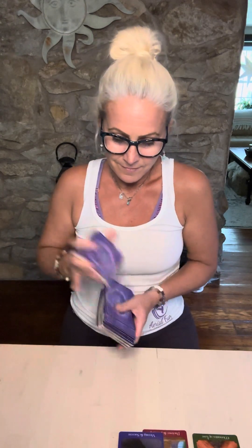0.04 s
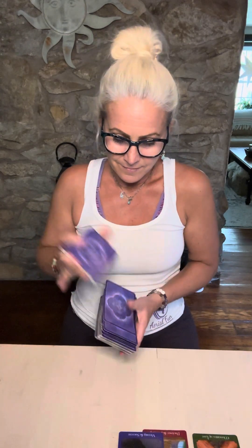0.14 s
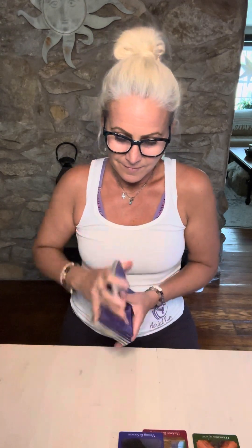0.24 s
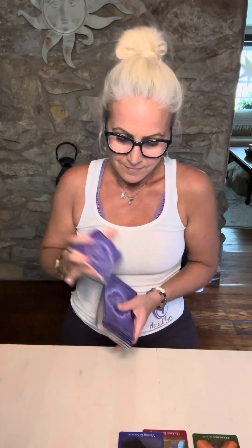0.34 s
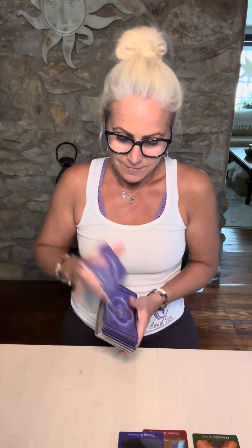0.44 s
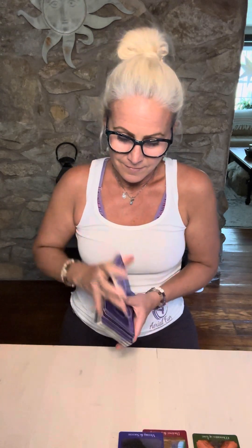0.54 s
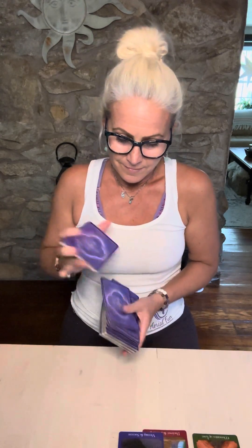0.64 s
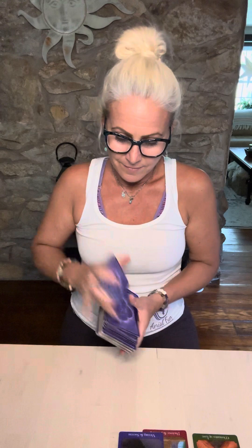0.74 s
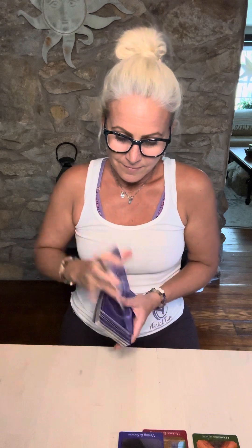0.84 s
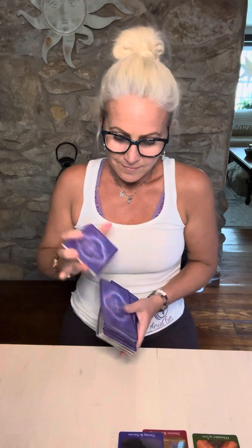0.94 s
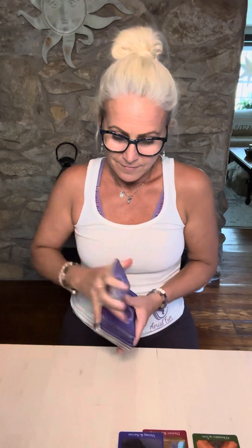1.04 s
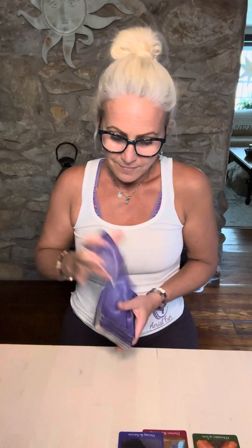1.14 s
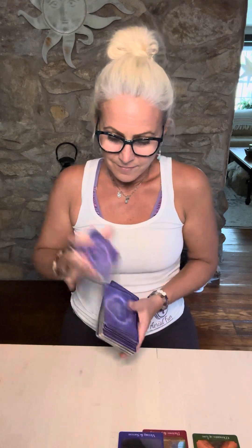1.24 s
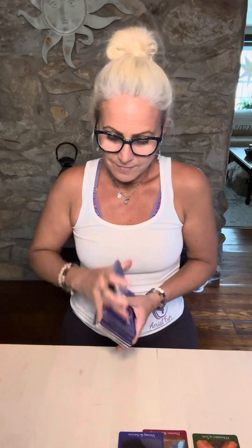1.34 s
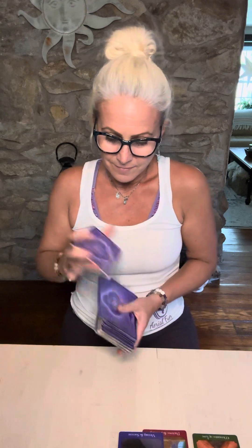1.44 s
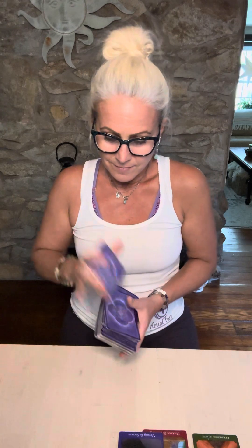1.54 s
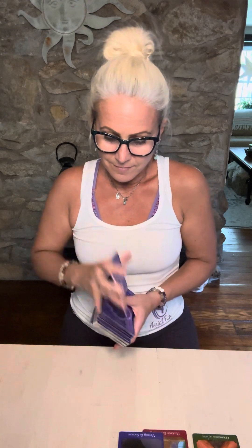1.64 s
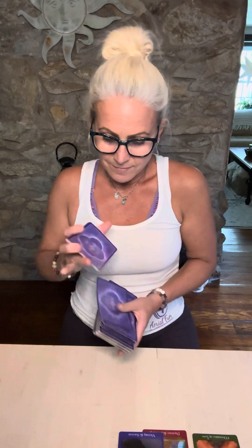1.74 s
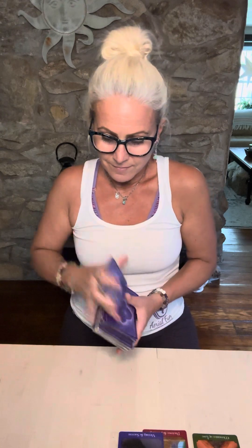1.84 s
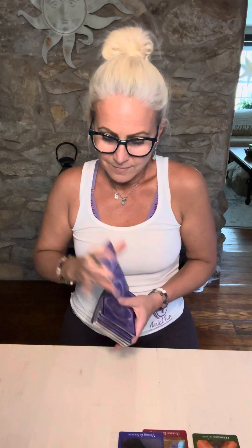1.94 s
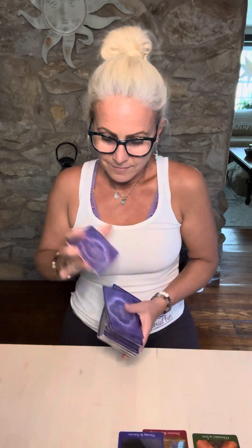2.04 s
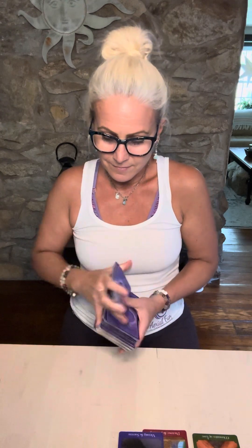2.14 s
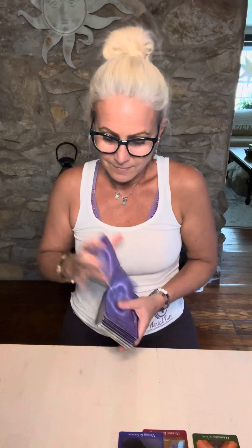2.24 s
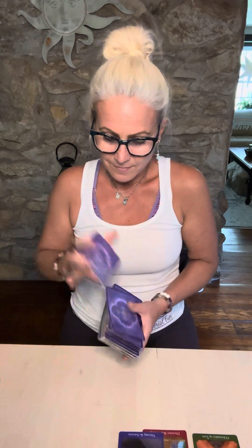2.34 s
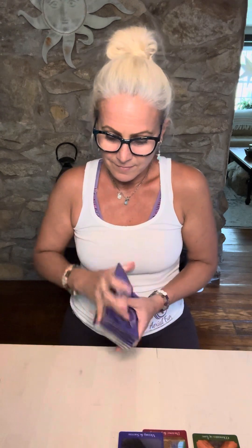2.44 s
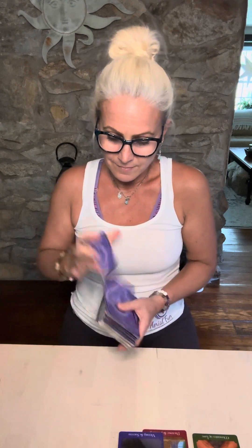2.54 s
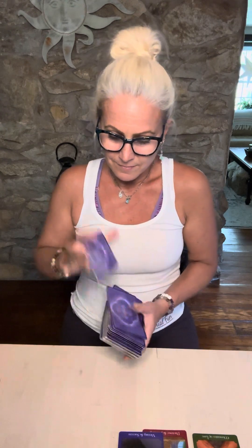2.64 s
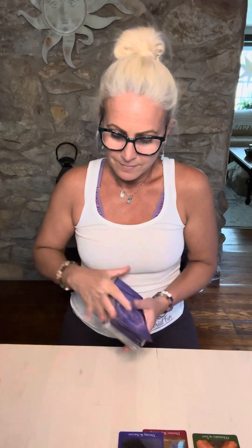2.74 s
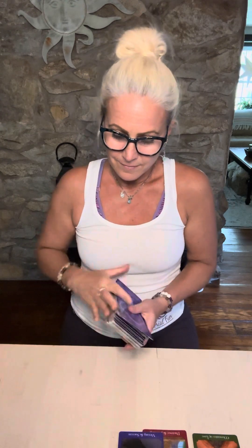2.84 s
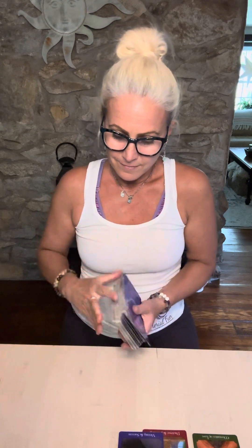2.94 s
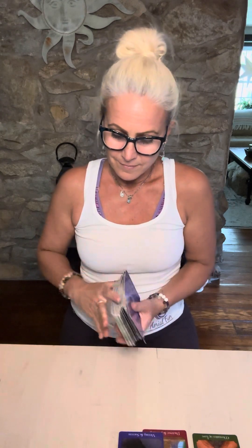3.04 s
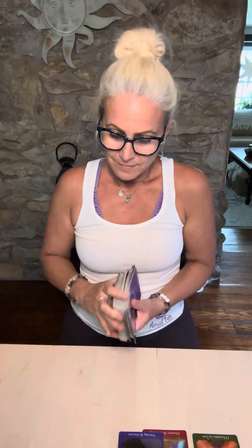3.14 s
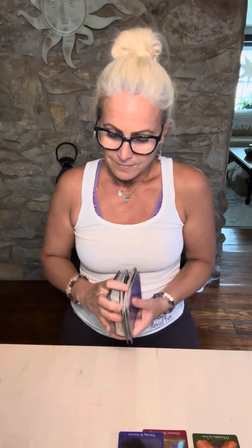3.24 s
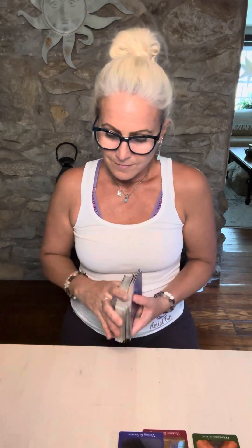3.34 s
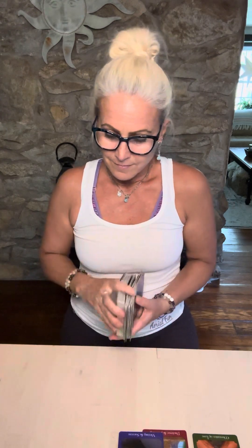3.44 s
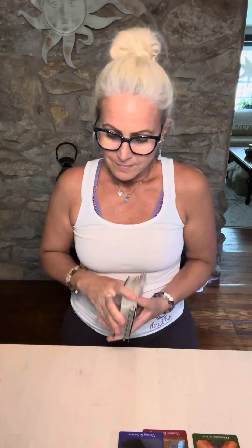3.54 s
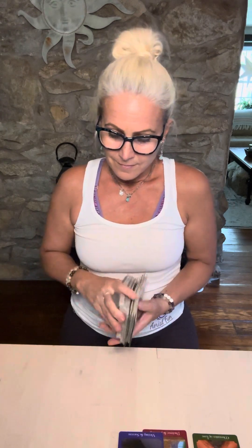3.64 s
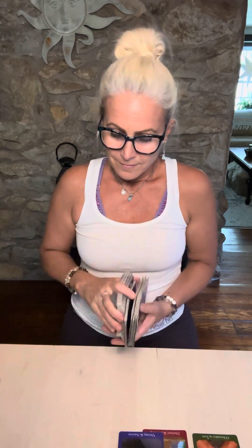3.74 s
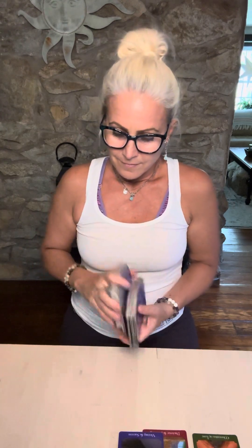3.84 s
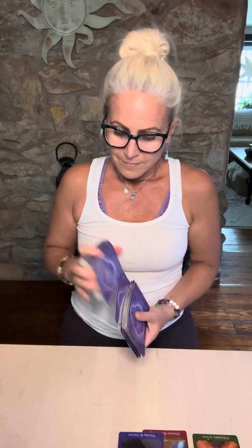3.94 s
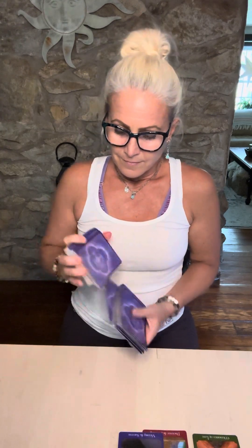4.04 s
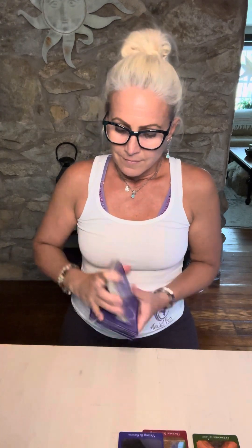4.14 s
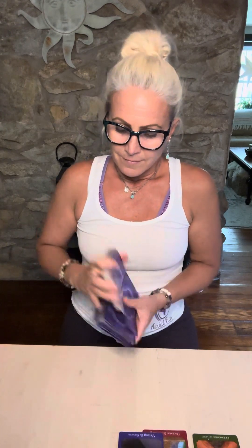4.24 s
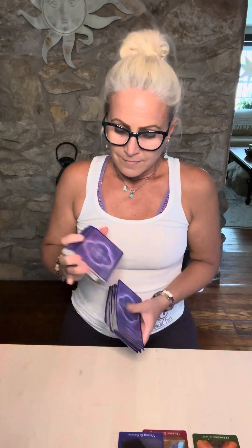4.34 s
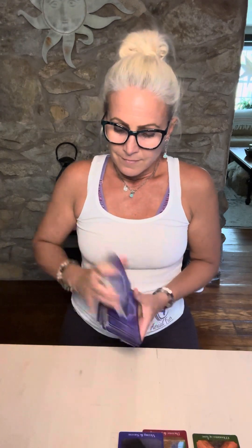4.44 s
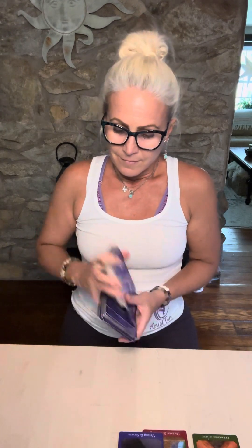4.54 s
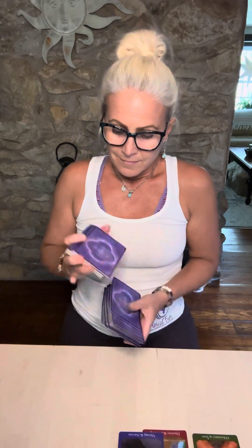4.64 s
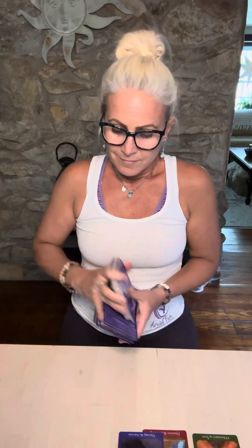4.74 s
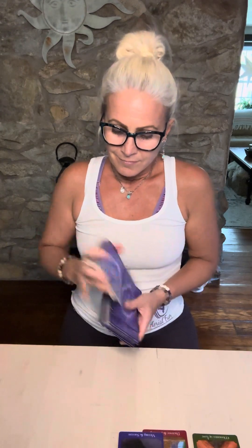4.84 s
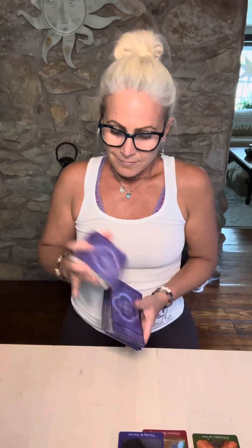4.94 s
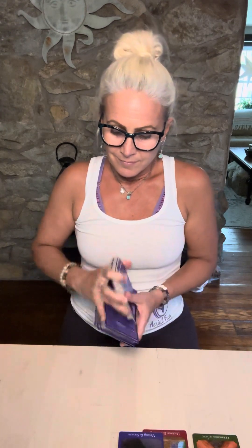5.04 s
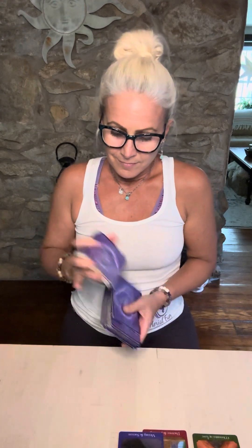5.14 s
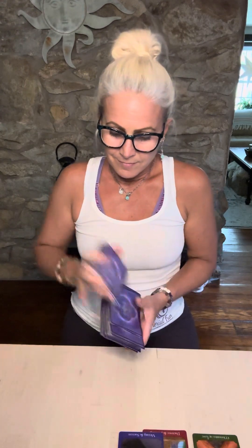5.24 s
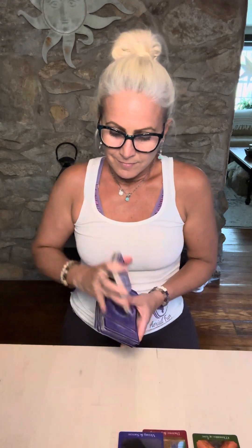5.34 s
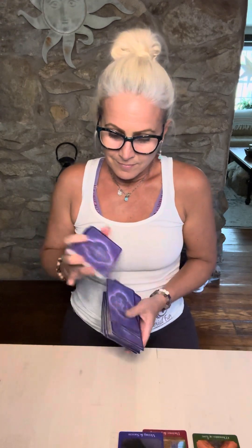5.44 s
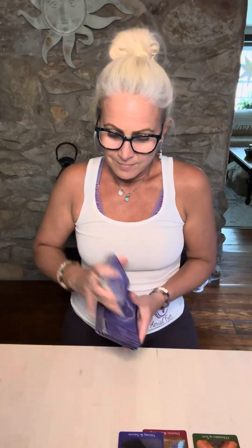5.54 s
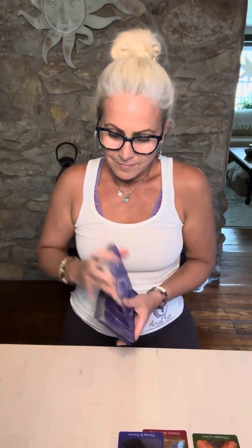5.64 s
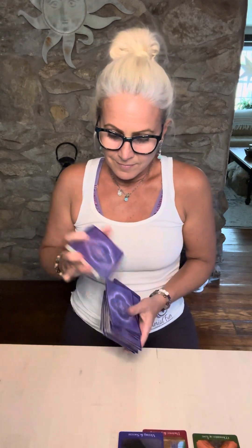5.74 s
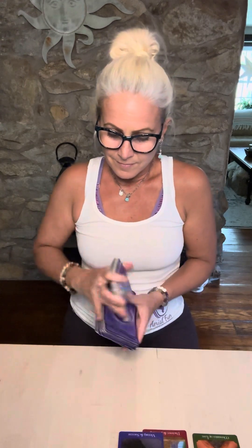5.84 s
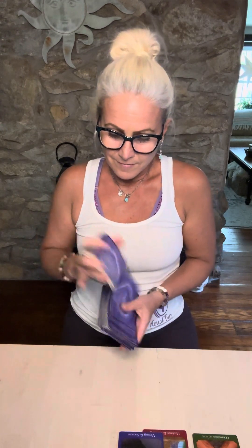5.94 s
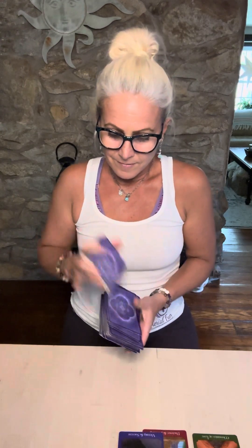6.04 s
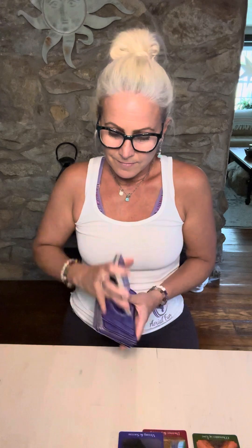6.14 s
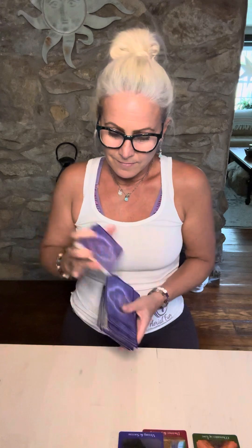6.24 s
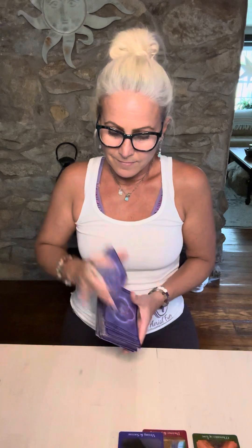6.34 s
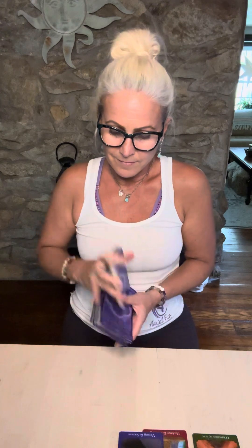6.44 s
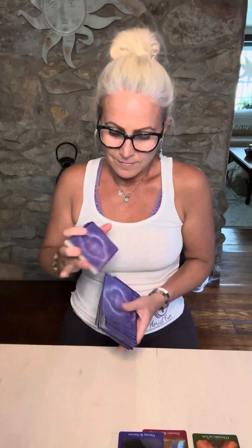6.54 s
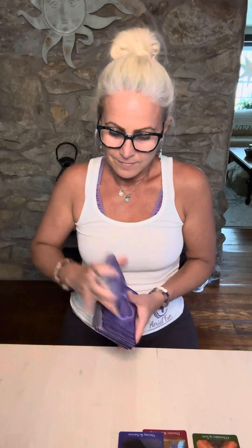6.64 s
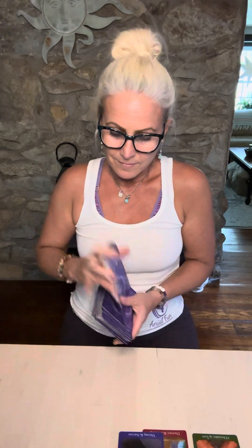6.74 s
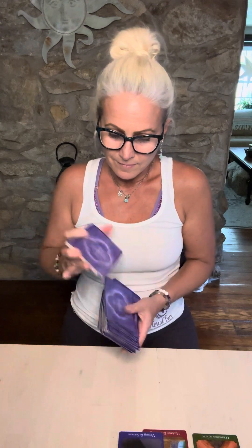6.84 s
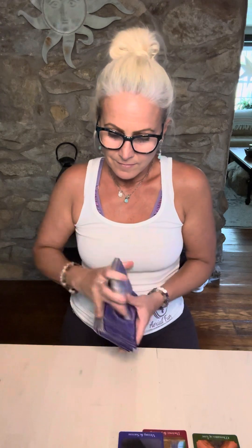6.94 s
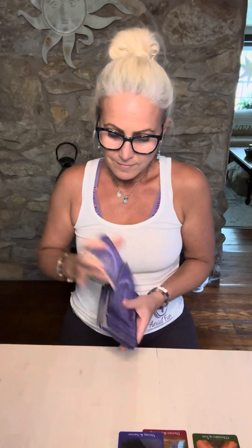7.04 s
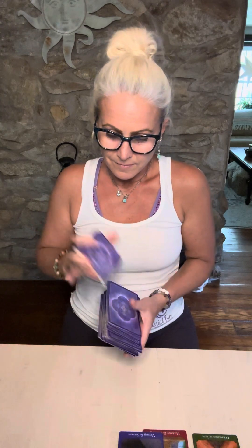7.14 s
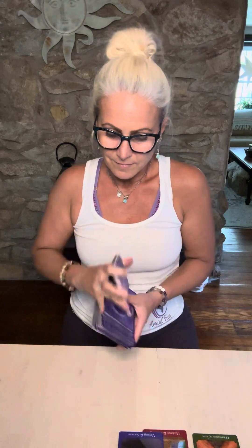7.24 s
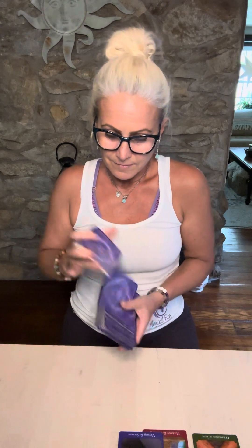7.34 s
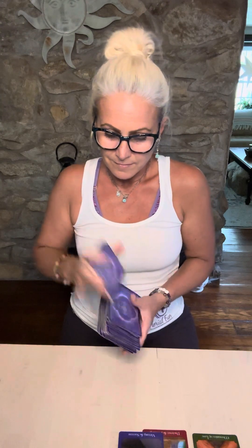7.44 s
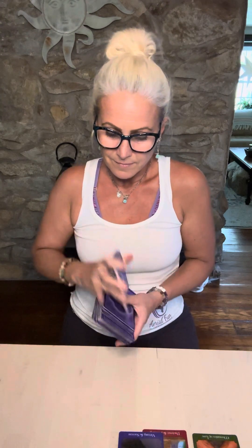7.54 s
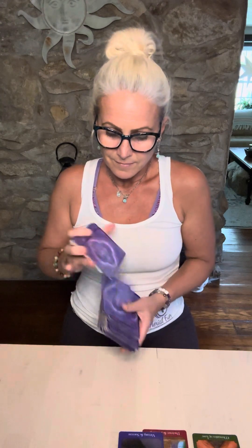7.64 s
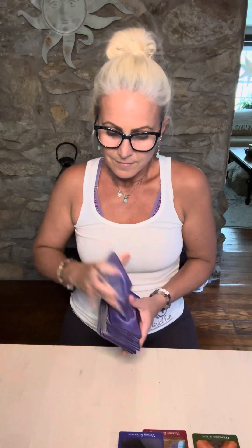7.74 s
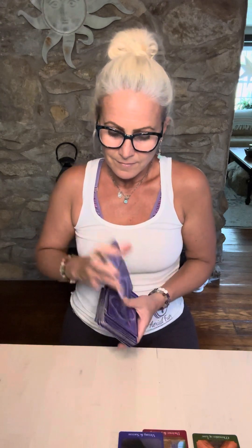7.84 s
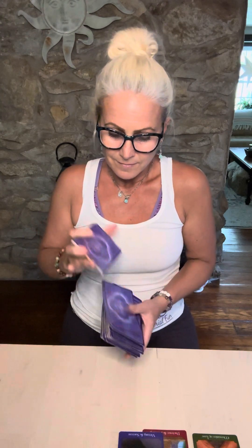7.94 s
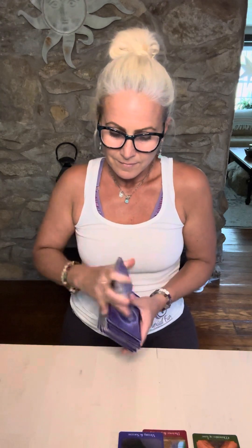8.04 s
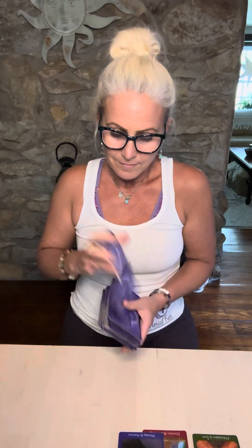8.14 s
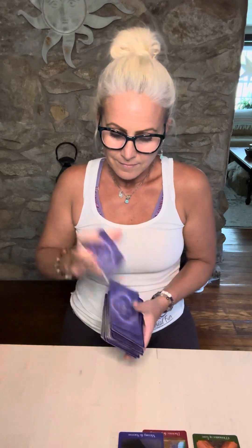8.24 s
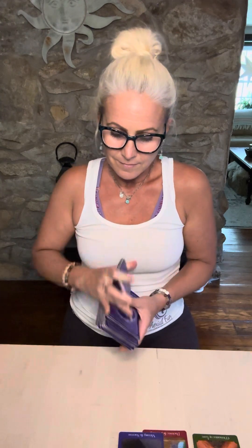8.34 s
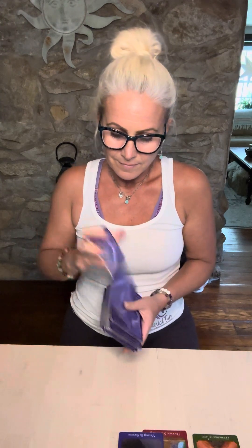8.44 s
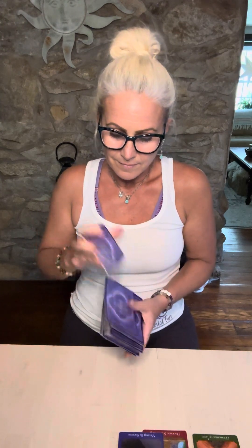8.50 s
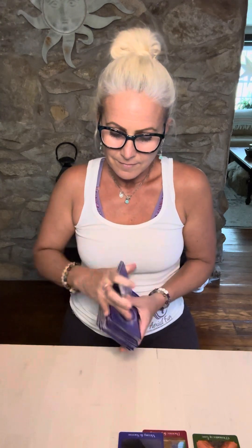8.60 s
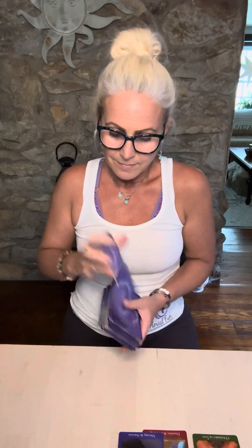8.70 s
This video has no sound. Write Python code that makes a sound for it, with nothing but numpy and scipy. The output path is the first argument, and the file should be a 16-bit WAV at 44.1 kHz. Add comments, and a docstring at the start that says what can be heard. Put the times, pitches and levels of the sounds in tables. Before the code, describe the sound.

A large deck of stiff cards is shuffled overhand in a small room, crisp snaps and papery slides repeating steadily with one short pause.

```python
"""In a small hard-walled room, a large deck of cards is shuffled overhand, three to four strokes a second.
In each stroke a packet slides off as wavering friction noise, and stiff edges flick free as bursts of snaps.
Packets land with a hollow clap of trapped air, a thump in the palm and a knock of edges, all resonant filtered noise.
Midway the deck is squared up during a short pause, with softer flicks and rubs. Light ticks, soft room noise,
a low hum and a faint hiss lie around the cards."""
import sys
import numpy as np
from scipy import signal
from scipy.fft import rfft, irfft, next_fast_len
from scipy.io import wavfile
from scipy.ndimage import uniform_filter1d

SR = 44100
rng = np.random.default_rng(int(sys.argv[2]) if len(sys.argv) > 2 else 0)


def inscribe(sig):
    """Save sig as 16-bit PCM at rate SR to the path in sys.argv[1].

    A 1-D sig is mono; a 2-D sig holds one channel per row.
    Samples are clipped to [-1, 1] before scaling.
    """
    pcm = np.round(np.clip(np.atleast_2d(sig).T, -1, 1) * 32767)
    wavfile.write(sys.argv[1], SR, pcm.astype(np.int16))


N = 386757  # length in samples

# Flicks of card edges, in strokes and while squaring up.
# Each row: time in seconds, relative strength in dB, typical stagger between cards in seconds.
FLICKS = [(0.142, -17, .0012), (0.2585, 4, .0016), (0.5366, 3.5, .001), (0.811, 3, .001),
          (1.0846, 3.5, .0005), (1.3575, 7, 0.00064), (1.627, 4.5, 0.00022), (1.8958, 5.5, .0005),
          (2.1692, 1.5, .0005), (2.4537, 5.5, .0005), (2.7436, -3.5, .0011), (3.3186, -10, 0.0018),
          (3.4957, -19, .0004), (3.697, -22.5, .002), (4.1868, -7.5, 0.0017), (4.5005, 2.5, .0006),
          (4.7861, 4.5, .0011), (5.0614, 2.5, .0008), (5.3336, 4, 0.00052), (5.608, 4.5, 0.00041),
          (5.8758, 4, .0011), (6.1478, 4.5, 0.00027), (6.424, 1.5, 0.00095), (6.702, 3.5, 0.00093),
          (6.9789, 4.5, .0006), (7.25, 1.5, 0.0013), (7.5275, 3, .0009), (7.7977, 5.5, 0.00061),
          (8.074, 2, .0009), (8.353, 1.1, 0.0012), (8.631, 1, .0009)]
# Card edges knocking against the deck. Each row: time in seconds, relative strength in dB,
# extra treble in dB, pitch of the air pocket in Hz, relative thud of the hand in dB.
KNOCKS = [(0.0297, -24, 28, 1180, 5), (0.0468, -13, 0, 600, -1), (0.3278, -16.5, 2, 1020, -3.5),
          (0.3427, -12.5, -2, 1010, -4), (0.6212, -13.5, 15, 630, 1), (0.9031, -12, 4, 497, -2),
          (1.1651, -5, 12, 770, -15), (1.4439, -5.5, 1, 520, -4), (1.7157, 1.5, 0, 700, 11),
          (1.993, -12.5, -5, 600, 1), (2.5196, -1, -1, 1010, -0.5), (2.7289, -0.5, 9, 1148, -1),
          (4.1395, -6.5, 13, 1080, -16), (4.1721, -11.5, 3, 1200, -15), (4.283, -17.5, 2, 580, 5),
          (4.5825, -14, 4, 681, 8), (4.8564, -0.7, 0, 1620, 0), (5.404, -17, 0, 1190, 4),
          (5.9445, -11, 3, 1060, -4), (6.213, -13.5, -6, 840, -13), (6.4573, -11, 17.5, 1020, -26),
          (6.4856, -18, 6, 1000, -18), (6.5174, -13, 18, 700, -3), (7.0765, -19, 14, 980, -9),
          (7.2916, -18.5, 17, 1000, -10), (7.3505, -15.5, 7, 650, 10), (7.62, -20, -20, 800, -8),
          (7.6512, -26.5, 26, 574, 11), (7.9017, -5, -1, 980, -6.5), (8.1748, -13, -5, 794, -12),
          (8.4686, -13.5, 13, 710, 3), (8.7371, -7.5, -11, 494, 4)]
# Packets landing flat on a cushion of air. Each row: time in seconds, relative strength in dB,
# pitch of the air pocket in Hz, relative thud of the hand in dB.
CLAPS = [(0.0237, -15.5, 1240, -3.5), (0.3189, -29, 1070, 2), (0.592, -27, 745, -2),
         (1.1386, -15, 1090, -12), (1.418, -27, 770, 0), (1.6899, -20, 815, -10), (1.9593, -15.5, 1320, -4),
         (2.2363, -13.5, 1120, -11), (2.5538, -24, 610, 15), (3.9735, -24, 555, -3),
         (4.2675, -24, 520, -11), (4.5837, -20, 685, -5.5), (4.741, -27.5, 590, -1),
         (5.1301, -21.5, 1560, -4.5), (5.4256, -22, 600, -14), (5.6673, -25, 676, -7),
         (5.7037, -26.5, 730, -10), (5.9641, -25.5, 850, -1), (6.205, -22.5, 840, -4),
         (6.461, -14.3, 980, -16), (6.4927, -17.5, 990, -8.5), (6.7751, -23.5, 775, -5),
         (6.8094, -25.5, 590, 4), (7.2921, -22.5, 1010, -10), (7.6512, -21, 574, -3),
         (8.142, -20.5, 740, -7), (8.7379, -27.5, 494, 1)]
# Squaring up the deck: start in seconds, end in seconds.
PAUSE = (2.8, 4.5)
# Firmness with which the faces are pressed together, greatest towards the end of the pause.
# Each row: time in seconds, friction in dB, to which the strength of the flick is added.
GRIP = [(0, -62.5), (2.5, -64.5), (3.3, -62), (4.2, -50), (4.8, -57), (5.7, -57.5), (6.5, -62.5),
        (8.7, -62)]
# Other scrapes and rubs of the cards: short ones early and just before the pause, longer ones in the pause.
# Each row: start in seconds, end in seconds, relative level in dB.
RUBS = [(0, 0.04, -45), (2.712, 2.75, -44), (3.102, 3.2, -65), (3.644, 3.757, -71), (3.83, 4.025, -63)]

# Tone colour of each contact. Each row: frequency in Hz, relative gain in dB.
TICK_COLOUR = [(300, -14), (2500, -12), (6000, 0.5), (10000, -2), (13000, 4.5), (15600, 4), (16300, -28)]
FLICK_COLOUR = [(300, -52), (3000, -31.5), (5000, -20.5), (6300, -12.5), (8000, -10.5), (10000, -10),
                (11000, -4.5), (12700, 0.5), (14500, 1.5), (15600, 0), (16200, -18)]
KNOCK_COLOUR = [(100, -13), (400, -2.5), (1500, -16.5), (2500, 2.5), (4300, 1), (6200, -2), (8300, -9),
                (10500, -16), (13000, -12), (15500, -18)]
SLIDE_COLOUR = [(80, -2), (300, 6.5), (1000, 1.5), (2300, 2), (3200, -1), (5000, -0.5), (8000, -18),
                (10500, -2.5), (13000, 0), (15600, 2), (16300, -28)]
CLAP_COLOUR = [(50, -12.5), (150, 1.5), (210, -6), (290, 4.5), (800, -1.5), (1400, 0), (2500, 1),
               (3300, -3), (6000, 0), (9000, -51), (16000, -64)]
THUMP_COLOUR = [(25, -23), (55, 2), (80, 13.5), (110, 5), (160, 6.5), (210, -4), (290, -5.5), (600, -22),
                (2000, -55)]

# Reverberation time of the room. Each row: frequency in Hz, time in seconds.
ROOM_DECAY = [(100, 0.8), (500, 0.23), (1600, 0.44), (2450, 0.32), (3200, 0.3648), (13000, 0.2751),
              (16000, 0.0042)]
# Tone of the reverberant tail. Each row: frequency in Hz, relative level in dB.
ROOM_LEVEL = [(100, 0.5), (500, 0.5), (2400, 1.5), (3500, -1.5), (6200, -5.5), (10500, -13.5),
              (13000, -2.5), (15500, -8.5), (16500, -38)]
# Early reflections from table, body and wall. Each row: typical delay in seconds, level in dB.
ECHOES = [(.0019, -9.5), (.0034, -11), (.0056, -23), (.0098, -16), (.033, -19)]
# Room resonances that colour the tail. Each row: frequency in Hz, width in Hz, boost or cut in dB.
ROOM_MODES = [(268, 50, 1.5), (574, 36, 9), (996, 29, -1.5), (1325, 110, 2.5), (1970, 73, 8),
              (2121, 60, 8.5), (2410, 600, 6.5)]

# Tone colour of the steady room noise. Each row: frequency in Hz, relative density in dB per Hz.
FLOOR_COLOUR = [(25, -9), (50, 7.5), (85, 7), (150, 3), (210, 0.5), (300, 0.5), (600, 0.5), (1700, -6),
                (2600, -5), (3000, -23), (6000, -21.5), (9000, -35), (12500, -17), (16000, -25)]
# Hum of an appliance. Each row: frequency in Hz, typical RMS level in dB.
HUM = [(84, -69), (119.5, -70)]
# Tone colour of the narrow band of hiss. Each row: frequency in Hz, relative gain in dB.
HISS_COLOUR = [(1200, -30), (1900, -13), (2250, 4.5), (2650, -3.5), (3000, -14.5), (4300, -12.5),
               (5000, -39)]
# Slow swell and ebb of the hiss. Each row: time in seconds, level in dB.
HISS_LEVEL = [(0, -75), (3.1, -72), (3.9, -65), (5.3, -59.5), (6.5, -75), (8.7, -64)]

# Phase between the two microphones. Each row: frequency in Hz, radians by which left leads.
MIC_PHASE = [(0, 0), (200, .1), (700, .4), (3200, 0), (4400, -.5), (5300, -1.8), (6000, -1.8), (6800, -2.9),
             (8700, -3.3), (11900, -6.1), (13300, -6.4), (15800, -8.3)]
# Likeness of diffuse sound at the two microphones. Each row: frequency in Hz, correlation from 0 to 1.
LIKENESS = [(60, .99), (250, .86), (700, .55), (2800, .25), (4300, .6), (5200, .4), (7800, .95),
            (10000, .7), (13000, .98), (15500, .8)]

FLOOR_DB = -61.5  # RMS level of the room noise
EDGE_HZ = 16500  # upper band limit
TAPS = 4096  # length of filters and contact noises in samples
HZ = np.fft.rfftfreq(TAPS, 1 / SR)
# Around each flick comes a light touch before and a straggling card after; dB relative to the flick.
TOUCH_LEAD_S, TOUCH_SCATTER_S, TOUCH_DB = .048, 0.0064, -25
STRAGGLER_LAG_S, STRAGGLER_SCATTER_S, STRAGGLER_DB = .066, .02, -19.5
LIGHT_STAGGER_S, LIGHT_UNEVEN_DB = .0003, 3.5
# The faces slide from just before each flick until shortly after it.
SLIDE_LEAD_S, SLIDE_LAG_S = 0.04, 0.101
# A flat landing settles slowly.
FLAT_SETTLE_S = .0038
# An edge knock also shuts the packet abruptly, with a clap that grows with the blow.
EDGE_CLAP_DB, EDGE_CLAP_FOLLOW, EDGE_SETTLE_S = -15.5, 0.61, 0.0021


def amp(db):
    """Decibels to gain."""
    return 10 ** (np.asarray(db) / 20)


def unit(x):
    """Scales a sound to an energy of one."""
    return x / np.sqrt(np.sum(x ** 2) + 1e-20)


def read(points, hz):
    """Joins the points of a spectrum on a log-frequency axis."""
    f, value = np.transpose(points)
    return np.interp(np.log(hz + 1), np.log(f + 1), value)


def add(mix, s, sound):
    """Adds a sound to the mix at time s."""
    part = mix[max(round(s * SR), 0):][:len(sound)]
    part += sound[:len(part)]


def ring(db):
    """Causal impulse response with the given gain at each frequency of HZ."""
    mirrored_db = np.r_[db, db[-2:0:-1]]
    log_gain = np.log(amp(mirrored_db))
    minimum_phase = np.conj(signal.hilbert(log_gain))
    return np.fft.ifft(np.exp(minimum_phase)).real


def coloured(x, points):
    """Passes a sound through a causal filter."""
    return signal.oaconvolve(x, ring(read(points, HZ)))[:len(x)]


def resonance(hz, q):
    """Gain of one damped resonance at each frequency of HZ."""
    detuning = (HZ + 1) / hz - hz / (HZ + 1)
    return 1 / np.sqrt(1 + q ** 2 * detuning ** 2)


def diffuse(pair):
    """Makes two unrelated noises as alike as two close microphones hear them."""
    z = rfft(pair)
    same = np.clip(read(LIKENESS, np.fft.rfftfreq(pair.shape[1], 1 / SR)), 0, 1)
    mid = z[0] * np.sqrt((1 + same) / 2)
    side = z[1] * np.sqrt((1 - same) / 2)
    return irfft([mid + side, mid - side], pair.shape[1])


def flurry(per_s, decay_s):
    """A dying run of tiny random contacts, with an energy of one."""
    contacts = (rng.random(TAPS) < per_s / SR) * rng.standard_normal(TAPS)
    return unit(contacts * np.exp(-np.arange(TAPS) / SR / decay_s))


def background(waver=0.35):
    """Soft steady room noise is filtered noise; the low hum is sines wavering in level and phase."""
    air = np.array([coloured(side, FLOOR_COLOUR) for side in diffuse(rng.standard_normal((2, N)))])
    t, hum = np.arange(N) / SR, np.zeros(N)
    for hz, db in HUM:
        drift = uniform_filter1d(rng.standard_normal((2, N)), size=9000)
        drift = uniform_filter1d(drift, size=2000)
        swell, slip = waver * drift / drift.std()
        hum += np.sqrt(2) * amp(db) * (1 + swell) * np.sin(2 * np.pi * hz * t + slip)
    return amp(FLOOR_DB) * air / air.std() + hum


def hiss():
    """A faint diffuse hiss, a narrow band of noise that slowly swells and ebbs."""
    air = np.array([coloured(side, HISS_COLOUR) for side in diffuse(rng.standard_normal((2, N)))])
    level_db = np.interp(np.arange(N) / SR, *np.transpose(HISS_LEVEL))
    return amp(level_db) * air / air.std()


def flick_slides():
    """One slide around each flick, louder with its strength and the grip: start s, end s, level dB."""
    rows = []
    for s, db, _ in FLICKS:
        grip_db = np.interp(s, *np.transpose(GRIP))
        rows.append((s - SLIDE_LEAD_S, s + SLIDE_LAG_S, db + grip_db))
    return rows


def slides(level_db=0, grip_db=4.5, catches_per_s=500, catch_size=2, fade=0.18):
    """Faces rub with a wavering grip and a fine grain of catching edges."""
    pressure = np.zeros(N)
    for start, end, db in flick_slides() + RUBS:
        length = max(round((end - start) * SR), 2)
        add(pressure, start, amp(db + level_db) * signal.windows.tukey(length, fade))
    grip = uniform_filter1d(rng.standard_normal(N), size=400)
    catches = (rng.random(N) < catches_per_s / SR) * rng.standard_normal(N)
    rubbing = rng.standard_normal(N) * amp(grip_db * grip / grip.std())
    friction = rubbing + catch_size * catches
    return coloured(pressure * friction, SLIDE_COLOUR)


def ticks(level_db=-37, per_s=45, spread_db=5, top_db=15, pause_db=-9):
    """Corners and fingernails tick lightly in clumps, more softly while the deck is squared up."""
    touching = uniform_filter1d(rng.standard_normal(N), size=3000) > 0
    at = np.flatnonzero(touching & (rng.random(N) < per_s / SR))
    sizes_db = np.minimum(spread_db * rng.exponential(1, N)[at], top_db)
    resting = (at > PAUSE[0] * SR) & (at < PAUSE[1] * SR)
    force = np.zeros(N)
    force[at] = amp(level_db + sizes_db + pause_db * resting)
    return coloured(force, TICK_COLOUR)


def landings():
    """Flat and edge-first landings: time s, strength dB, pocket Hz, thud dB, settling time s."""
    flat = [(s, db, hz, thud_db, FLAT_SETTLE_S) for s, db, hz, thud_db in CLAPS]
    edge_first = []
    for s, db, _, hz, thud_db in KNOCKS:
        clap_db = EDGE_CLAP_DB + EDGE_CLAP_FOLLOW * db
        edge_first.append((s, clap_db, hz, thud_db, EDGE_SETTLE_S))
    return flat + edge_first


def claps(level_db=6, width_hz=330, leak_hz=750, seal_s=0.0028, thud_hz=260, thud_q=0.31, thud_db=0,
          flutter=1.37, swish_db=-14, swish_s=0.0051):
    """Air swishes out as the packet closes in and rings the pocket in the palm; the hand gives a dull thud."""
    out, t = np.zeros(N), np.arange(TAPS) / SR
    for s, db, hz, hand_db, settle in landings():
        landing = flutter * unit(rng.standard_normal(TAPS) * np.exp(-t / (2 * settle)))
        landing[0] += np.exp(-settle / 0.007)  # a slow landing has a softer first contact
        swish = unit(rng.standard_normal(TAPS) * np.exp(-t / swish_s))
        swish = swish[:round(s * SR)][::-1]  # grows up to the landing
        force = np.r_[amp(swish_db) * swish, unit(landing)]
        # an abrupt landing traps little air and hardly rings
        width = width_hz + leak_hz * np.exp(-(settle / seal_s) ** 2)
        thud = amp(hand_db + thud_db) * resonance(thud_hz, thud_q) ** 2
        body = np.hypot(resonance(hz, hz / width), thud)
        pocket = ring(20 * np.log10(body) + read(CLAP_COLOUR, HZ))
        clap = unit(signal.fftconvolve(force, pocket))
        add(out, s - len(swish) / SR, amp(db + level_db) * clap)
    return out


def thumps(level_db=-3, follow=0.48, length_s=0.019):
    """Each landing also shoves the whole deck into the palm: a soft low bump that grows with the blow."""
    force, t = np.zeros(N), np.arange(TAPS) / SR
    for s, db, *_ in landings():
        push = unit(rng.standard_normal(TAPS) * np.exp(-t / length_s))
        add(force, s, amp(level_db + follow * db) * push)
    return coloured(force, THUMP_COLOUR)


def knocks(level_db=-1, chatter=0.69, chatter_s=0.0012, loose_db=-10, loose_per_s=250, loose_s=0.015,
           treble_from_hz=4500, treble_full_hz=11000):
    """One hard contact of the packet's edge chatters briefly, then loose cards drop into place one by one."""
    out, t = np.zeros(N), np.arange(TAPS) / SR
    treble_share = read([(treble_from_hz, 0), (treble_full_hz, 1)], HZ)
    for s, db, treble_db, *_ in KNOCKS:
        force = chatter * unit(rng.standard_normal(TAPS) * np.exp(-t / chatter_s))
        force[0] += 1  # the hard contact
        force += amp(loose_db) * flurry(loose_per_s, loose_s)
        colour = read(KNOCK_COLOUR, HZ) + treble_db * treble_share
        add(out, s, amp(db + level_db) * signal.fftconvolve(unit(force), ring(colour)))
    return out


def edge_contacts():
    """Every flick has a light touch before and a straggler after: time s, strength dB, stagger s."""
    rows = []
    for s, db, stagger in FLICKS:
        early, late = rng.uniform(-1, 1, 2)
        touch_db, straggler_db = LIGHT_UNEVEN_DB * rng.standard_normal(2)
        touch_s = s - TOUCH_LEAD_S + TOUCH_SCATTER_S * early
        straggler_s = s + STRAGGLER_LAG_S + STRAGGLER_SCATTER_S * late
        rows += [(touch_s, db + TOUCH_DB + touch_db, LIGHT_STAGGER_S),
                 (s, db, stagger),
                 (straggler_s, db + STRAGGLER_DB + straggler_db, LIGHT_STAGGER_S)]
    return rows


def flicks(level_db=0, uneven_db=2, count=4, trail_db=-4, trail_s=0.0023, fan_db=-9.0, fan_s=0.038,
           cards_per_s=1400, drag_db=-22, drag_s=0.0019):
    """A few stiff edges drag and snap free; lighter cards trail, and the rest of the packet fans past softly."""
    out, snap = np.zeros(N), ring(read(FLICK_COLOUR, HZ))
    for s, db, stagger in edge_contacts():
        trail = amp(trail_db) * flurry(cards_per_s, trail_s)
        fan = amp(fan_db) * flurry(cards_per_s, fan_s)
        force = trail + fan
        delays = np.r_[0, np.cumsum(abs(stagger) * rng.uniform(.3, 1.2, count - 1))]
        sizes = unit(amp(uneven_db * rng.standard_normal(count)))
        for delay, size in zip(delays, sizes):
            add(force, delay, np.array([size]))
        drag = amp(drag_db) * flurry(cards_per_s, drag_s)[::-1]  # grows up to the snap
        burst = unit(signal.fftconvolve(np.r_[drag, force], snap))
        add(out, s - len(drag) / SR, amp(db + level_db) * np.linalg.norm(snap) * burst)
    return out


def reflections(build_s=0.0015, shift=.2):
    """A few near reflections, and a dense tail in which each band dies at its own speed."""
    hz, t, z = signal.stft(rng.standard_normal((2, SR)), SR, nperseg=256)
    t60 = read(ROOM_DECAY, hz)[:, None]
    even_energy = np.sqrt(2 * np.log(1000) / (t60 * SR))  # offsets the energy of a longer decay
    decay = amp(-60 * t / t60) * even_energy
    tail = signal.istft(z * decay, SR, nperseg=256)[1][:, :SR]
    tail *= 1 - np.exp(-(np.arange(SR) / SR / build_s) ** 2)
    modes_db = sum(db / (1 + (2 * (HZ - f) / width) ** 2) for f, width, db in ROOM_MODES)
    tone = ring(read(ROOM_LEVEL, HZ) + modes_db)
    response = signal.fftconvolve(diffuse(tail), tone[None], axes=1)
    for delay, db in ECHOES:
        moved = delay * (1 + shift * rng.uniform(-1, 1))
        response[:, round(moved * SR)] += amp(db)
    return response


def room(x, count=5, step_s=.27):
    """The sound fades round a cycle of reflection patterns, so that successive tails differ."""
    place, out = np.arange(N) / SR / step_s, np.array([x, x])
    for k in range(count):
        away = abs((place - k + count / 2) % count - count / 2)
        share = np.cos(np.pi / 2 * np.minimum(away, 1))
        out += signal.fftconvolve((x * share)[None], reflections(), axes=1)[:, :N]
    return out


def scene():
    """The card sounds and their room, over the steady background and the swelling hiss."""
    cards = flicks() + ticks() + knocks() + claps() + thumps() + slides()
    return room(cards) + background() + hiss()


def record(dry):
    """The microphone pair shifts the phase between the sides; then the band limit."""
    size = next_fast_len(N + TAPS)
    lead = read(MIC_PHASE, np.fft.rfftfreq(size, 1 / SR))
    turn = np.exp(.5j * np.array([lead, -lead]))  # half of the lead on each side
    pair = irfft(rfft(dry, size) * turn, size)[:, :N]
    low_pass = signal.firwin(255, EDGE_HZ, window=("kaiser", 9), fs=SR)
    return signal.oaconvolve(pair, low_pass[None], "same")


dry = scene()
out = record(dry)
inscribe(out)
```